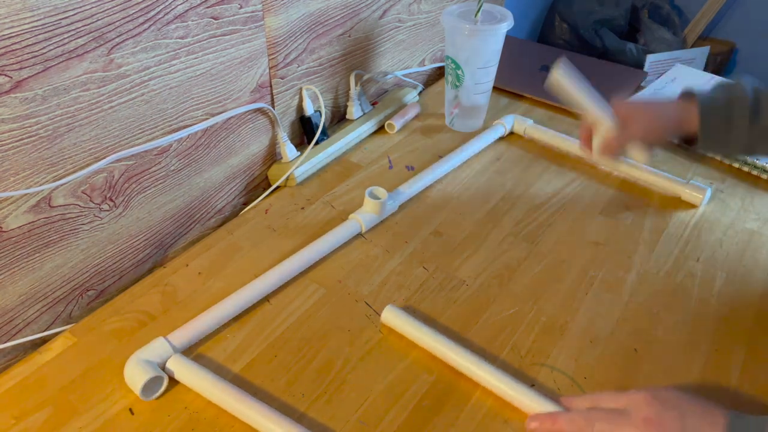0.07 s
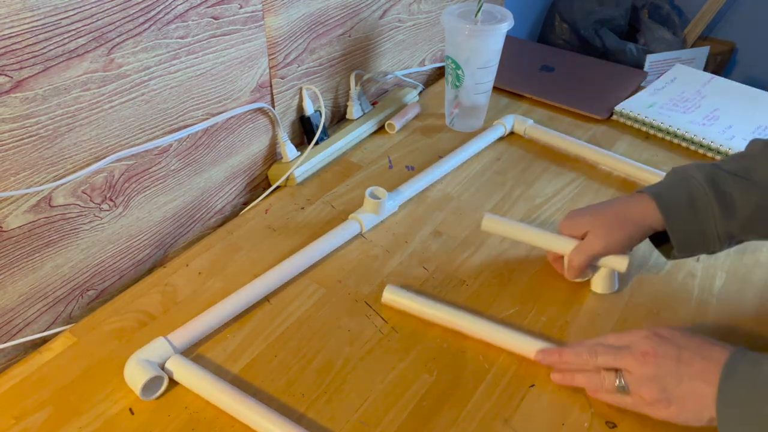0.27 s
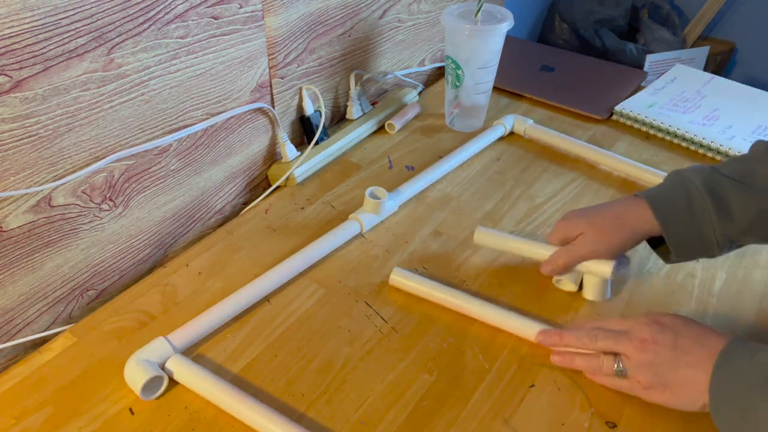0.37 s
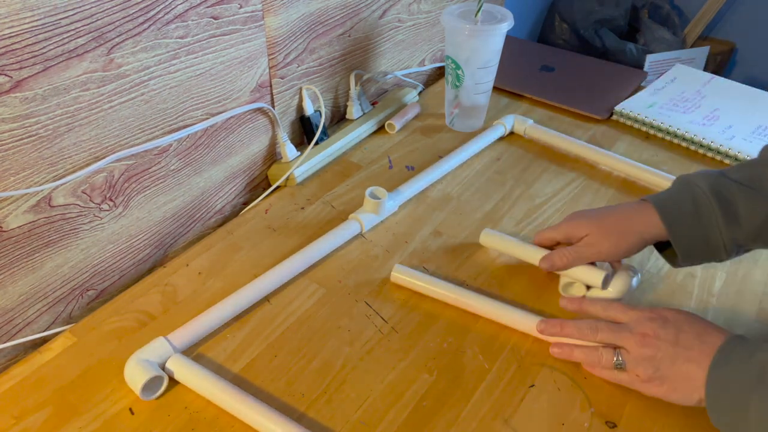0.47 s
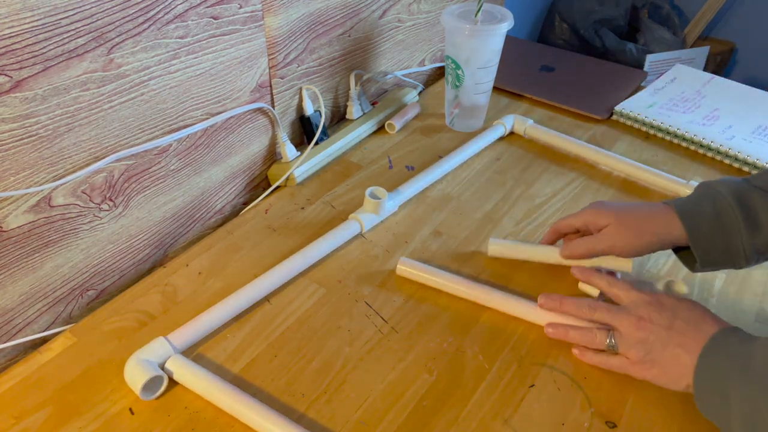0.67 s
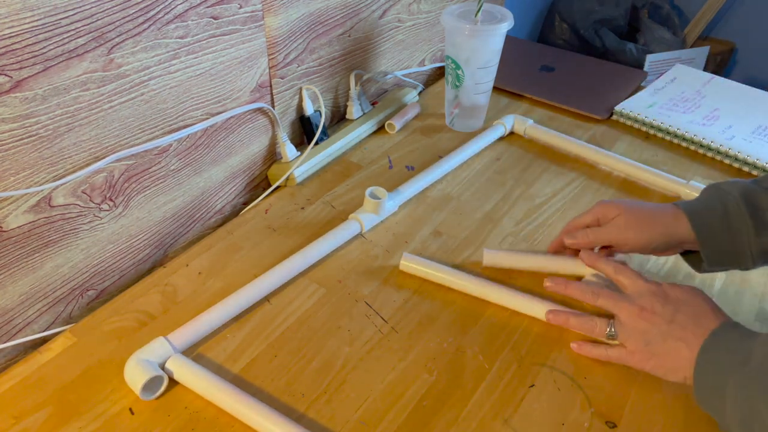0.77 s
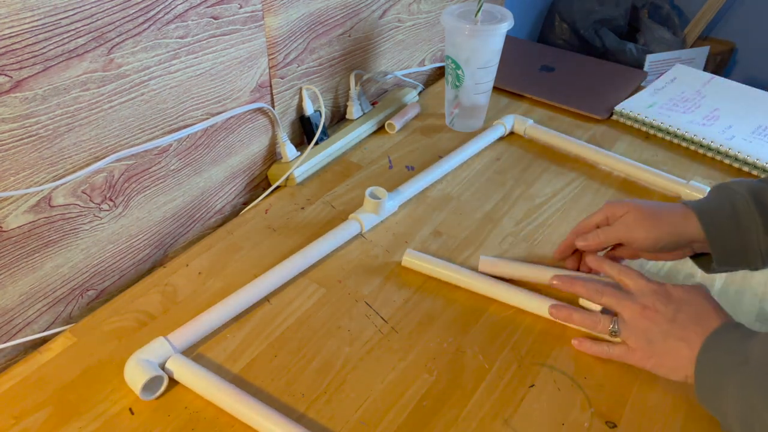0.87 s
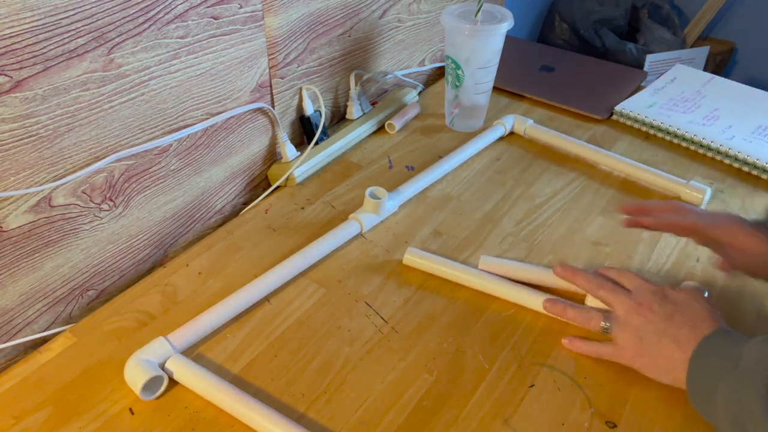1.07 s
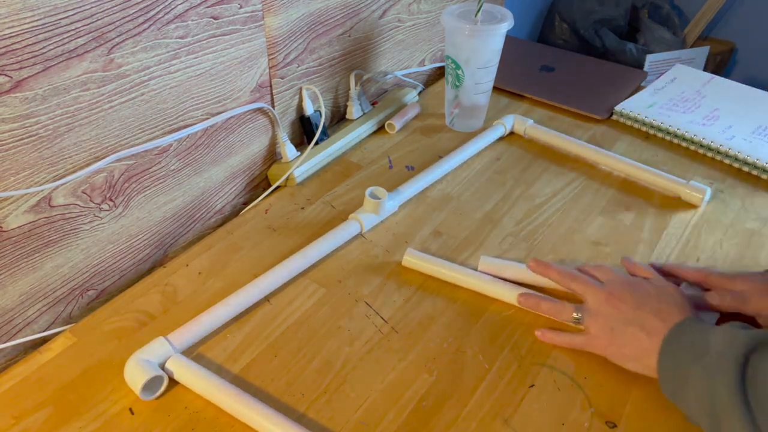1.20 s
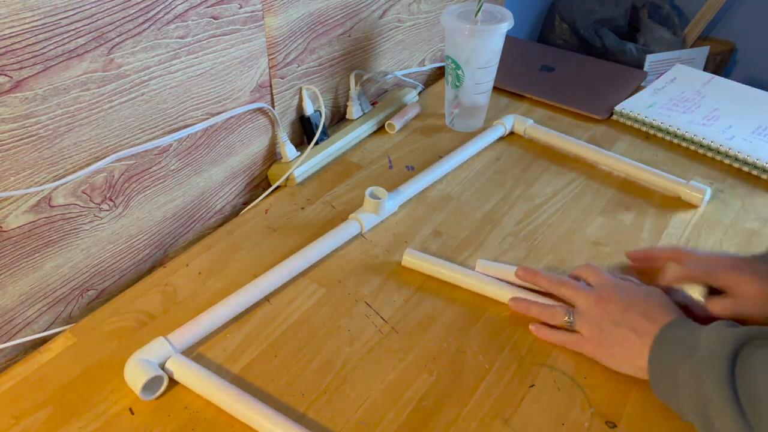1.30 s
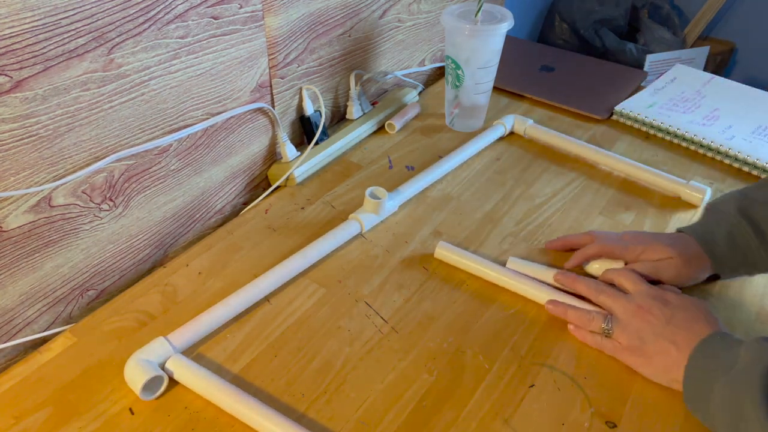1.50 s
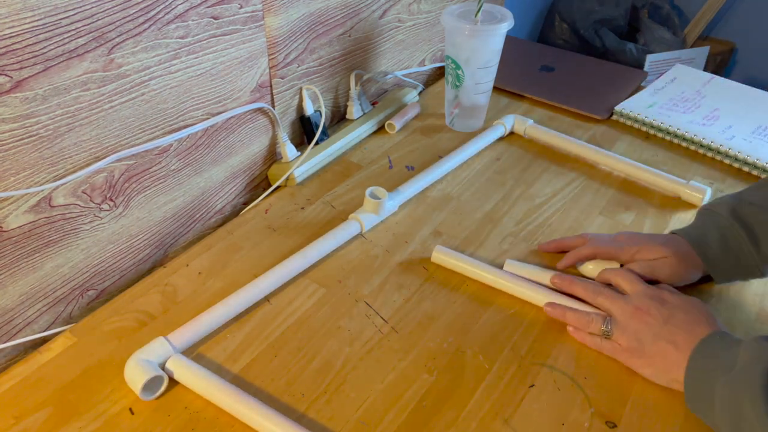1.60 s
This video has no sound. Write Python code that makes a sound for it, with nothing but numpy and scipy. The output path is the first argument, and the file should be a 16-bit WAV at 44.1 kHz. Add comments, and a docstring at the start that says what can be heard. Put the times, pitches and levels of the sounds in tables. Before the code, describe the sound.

Short lengths of plastic pipe knock together and rattle on a wooden table in a small room

```python
"""Hollow knocks, clacks and short rattles are heard in a small room, with dragging and scraping between.
Short plastic pipes are set down on a wooden table and pushed together: each knock is a noisy crack plus
dying sines for the ringing pipes. Soft thumps ring the tabletop, and fading bounces make the chatter.
Dragging and scraping are filtered clicks, with gliding, rough tones where the plastic judders.
An echoing tail of fading noise makes the room, over a quiet background noise."""
import sys
import numpy as np
from scipy import signal
from scipy.fft import rfft, irfft
from scipy.io import wavfile
from scipy.ndimage import uniform_filter1d

SR = 44100
rng = np.random.default_rng(int(sys.argv[2]) if len(sys.argv) > 2 else 0)


def waveform_to_disk(signal):
    """Save audio, clipped to [-1, 1], as 16-bit WAV at the path in sys.argv[1]."""
    frames = np.transpose(np.atleast_2d(signal))
    scaled = np.clip(frames, -1, 1) * 32767
    samples = np.round(scaled).astype(np.int16)
    wavfile.write(sys.argv[1], SR, samples)


N = 72765

# Colour of the background noise. Each row: frequency in Hz, relative level in dB.
FLOOR_COLOUR = [(25, -5), (110, 9.5), (230, -2), (600, 3), (2000, -27.5), (14000, -36.5)]
# How long the room rings. Each row: frequency in Hz, time to fade by 60 dB in seconds.
ROOM_FADE_TIMES = [(1300, 0.3), (4500, 0.2)]
# Strength of the room tail. Each row: frequency in Hz, level in dB.
ROOM_LEVELS = [(100, -26), (380, -2.5), (3000, -3.5), (8000, -6.5)]
# How alike left and right are in the room tail. Each row: frequency in Hz, likeness from -1 to 1.
ROOM_SIDE_LIKENESS = [(140, -0.16), (330, -0.13)]
# One pipe dragged over the wood. Each row: time in seconds, level in dB.
DRAG_LEVELS = [(0, -39.5), (.2, -43), (.33, -28), (.62, -41), (.72, -32), (.9, -29.5), (.98, -44),
               (1.08, -59)]
# Colour of the dragging. Each row: frequency in Hz, relative level in dB.
DRAG_COLOUR = [(40, -20), (100, 5.5), (220, -2), (420, 3), (800, -1), (2600, -25), (9000, -44.5)]
# Both pipes scraping along. Each row: time in seconds, level in dB.
SCRAPE_LEVELS = [(1.16, -64.5), (1.2, -40.5), (1.37, -34), (1.46, -38), (1.525, -46), (1.56, -68)]
# Colour of the scraping. Each row: frequency in Hz, relative level in dB.
SCRAPE_COLOUR = [(100, -1.5), (350, 3), (720, 11), (1300, -2), (2800, -19.5), (8500, -24.5), (11500, -41)]
# Juddering plastic, one list for each tone. Each row: time in seconds, pitch in Hz, level in dB.
JUDDER_TONES = [
    [(.01, 1250, -38), (.075, 715, -49), (.2, 691, -47.5)],
    [(.1, 291.2, -32), (.16, 407.6, -42.5), (.21, 406, -45)],
    [(1.22, 640, -45), (1.35, 755.3, -23.5), (1.47, 683, -52)],
    [(1.215, 830, -41), (1.335, 1312, -29), (1.48, 1249, -42.5)],
]
# Weight lands on the tabletop. Each row: start in seconds, relative level in dB.
THUDS = [(0.088, -38.5), (0.231, -18), (0.3645, -20.5), (0.416, -22.5), (0.524, -27.5), (0.786, -20),
         (1.16, -27.5), (1.471, -40)]
# Ways the tabletop rings. Each row: frequency in Hz, level in dB, time to fade by 60 dB in seconds.
TABLE_MODES = [(81.5, -10.5, 0.23), (116.8, -2, 0.18), (172, -2.5, 0.041)]
# The pipes chatter as they settle. Each row: start in seconds, length in seconds, relative first level in dB.
CHATTERS = [(0.385, .08, -19.5), (0.835, 0.084, -20.5)]
# Ways the pipes ring. Each row: middle frequency in Hz, relative level in dB, 60 dB fade time in seconds.
PIPE_MODES = [(387.7, -6, 0.11), (479.2, -10, 0.21), (561.5, -3, 0.14), (668, -3, 0.071),
              (739, -4.5, 0.091), (933, -4, 0.14), (983.5, 2.5, 0.056), (1169.4, 2, 0.039),
              (1304, -7, 0.12), (1640, -7.5, 0.17), (2072, -10, 0.12), (2538, -14.5, 0.29)]
# Colour shared by all contacts. Each row: frequency in Hz, relative level in dB.
CONTACT_COLOUR = [(240, -4), (430, 1.5), (2000, 2), (5600, -10), (7300, -7.5), (9500, -13.5),
                  (11500, -40.5), (15000, -21)]
# Pipe meets pipe or table. Each row: start in seconds, relative levels of the hollow body, the clack
# and the tick in dB, pitch of the struck wall in Hz.
KNOCKS = [(0.012, -28, -35, -44.5, 1495), (0.2288, -3, -14, -18, 1257), (0.3222, -25, -23, -23, 4015),
          (0.3605, -7.5, -14.5, -17, 1585), (0.3745, -24, -15.5, -14.5, 4310),
          (0.4105, -20.5, -18, -21, 2595), (0.5195, -11.5, -30, -40, 2420),
          (0.5268, -16, -20.5, -34.5, 1650), (0.549, -15.5, -22.5, -41.5, 1700),
          (0.5745, -18.5, -44, -48, 1650), (0.6998, -22.5, -27.5, -35, 3810),
          (0.7395, -19, -23, -29.5, 2180), (0.773, -13, -20.5, -24.5, 2100), (0.7835, -9, -10, -13.5, 2688),
          (0.8088, -22, -29, -29.5, 4400), (0.8133, -20.5, -24, -25, 4530),
          (0.8268, -17, -11.5, -15.5, 2756), (0.8305, -12.5, -13.5, -25, 4030),
          (0.9615, -49, -32.5, -44.5, 2655), (1.019, -36.5, -42, -53.5, 1620),
          (1.153, -32.5, -52, -54, 1240), (1.1645, -14, -29.5, -35.5, 1217), (1.1985, -26, -17, -32, 4280),
          (1.2648, -29.5, -29.5, -45, 2715), (1.3725, -17, -28, -48.5, 1663)]

TIME = np.arange(N) / SR  # seconds
PULSE_SIZE = 2048  # samples
BODY_HZ, CLACK_HZ, TICK_HZ = 1245, 2473, 6130  # where the three knock levels apply

FLOOR_DB = -57
ROOM_BUILD_S = 0.0031  # time scale on which the room tail swells in
GRAINS_PER_S, GRAIN_SPREAD_DB, RUB_LIKENESS = 2200, 0.5, 0.91
JUDDER_WIDTH_HZ, JUDDER_EDGE_S = 47, 0.0096  # fastest roughness; fade at both ends
THUD_DB, PUSH_S = 8, 0.0022  # added to every thud; a push peaks after a quarter of PUSH_S

CHATTER_PER_S, CHATTER_FADE_DB = 90, 12  # average bounce rate; drop over one run
CHATTER_CLACK_DB, CHATTER_TICK_DB = -3.5, -15  # compared with the body level
RING_DB, STRIKE_SPREAD_DB = -11.5, 1  # added to every pipe mode; its random spread
GRIP_DETUNE = 0.0078  # typical share by which the hand's hold shifts a mode from knock to knock
WALL_DB, WALL_T60_S = -3, 0.029  # level of a wall tone at CLACK_HZ; its 60 dB fade time
WALL_OVERTONE, WALL_OVERTONE_DB = 1.58, -1.5  # compared with the wall tone
CRACK_DB, CRACK_T60_S, CRACK_LIKENESS = 27, 0.052, 0.17
SNAP_ABOVE_HZ, SNAP_T60_S = 3360, 0.019  # the treble of a crack dies sooner


def from_db(db):
    """Turn decibels into a gain."""
    return 10 ** (np.asarray(db) / 20)


def rms_one(x):
    """Scale a sound so that its average strength (rms) is 1."""
    return x / np.sqrt(np.mean(x ** 2) + 1e-20)


def at_hz(points, hz):
    """Read a table between its rows, on a log-frequency axis."""
    table_hz, values = np.transpose(points)
    return np.interp(np.log(np.maximum(hz, 1)), np.log(table_hz), values)


def through(x, response):
    """Pass a sound through an impulse response, the answer of a body or room to one click."""
    return signal.fftconvolve(np.atleast_2d(x), np.atleast_2d(response), axes=-1)[:, :N]


def pulse(*colours):
    """Make a click that starts at once (minimum phase) and has the given colours, multiplied."""
    hz = np.arange(PULSE_SIZE // 2 + 1) * SR / PULSE_SIZE
    total_db = sum(at_hz(colour, hz) for colour in colours)
    cepstrum = irfft(np.log(from_db(total_db)))
    # Folding the second half onto the first packs the energy at the start.
    fold = np.r_[1, np.full(PULSE_SIZE // 2 - 1, 2), np.zeros(PULSE_SIZE // 2)]
    return irfft(np.exp(rfft(cepstrum * fold)))


def add(track, s, sound):
    """Mix a sound into a track at a time in seconds."""
    i = int(np.clip(s * SR, 0, N - 1))
    track[..., i:i + sound.shape[-1]] += sound[..., :N - i]


def stereo(pair, likeness):
    """Turn two unrelated signals into left and right of a given likeness."""
    c = np.clip(likeness, -1, 1)
    middle = np.sqrt((1 + c) / 2) * pair[0]
    side = np.sqrt((1 - c) / 2) * pair[1]
    return middle + side * np.array([[1], [-1]])


def ringing(modes, size=N):
    """A struck body rings as a sum of dying sines, here of alternating sign."""
    t = TIME[:size]
    out = 0
    for k, (hz, db, t60) in enumerate(modes):
        fade = from_db(db - 60 * t / t60)
        out = out + (-1) ** k * fade * np.sin(2 * np.pi * hz * t)
    return out


def background():
    """A quiet, steady noise with a fixed colour."""
    noise = stereo(rng.standard_normal((2, N)), 0.09)
    return from_db(FLOOR_DB) * rms_one(through(noise, pulse(FLOOR_COLOUR)))


def room():
    """Impulse response of the room: a diffuse noise tail that dies band by band."""
    out = 0
    edges = 60 * 2 ** (np.arange(18) / 2)  # half-octave bands
    white = rng.standard_normal((2, 2, N))
    for k, (low, high) in enumerate(zip(edges, edges[1:])):
        hz = np.sqrt(low * high)
        band_filter = signal.butter(2, [low, high], "band", fs=SR, output="sos")
        band = signal.sosfilt(band_filter, white[k % 2])
        build = 1 - np.exp(-(TIME / ROOM_BUILD_S) ** 2)
        fade = from_db(-60 * TIME / at_hz(ROOM_FADE_TIMES, hz)) * build
        fade = fade / np.linalg.norm(fade)
        level = from_db(at_hz(ROOM_LEVELS, hz))
        out = out + level * stereo(band, at_hz(ROOM_SIDE_LIKENESS, hz)) * fade
    return out


def rub(levels, colour):
    """Sliding friction: a dense stream of tiny catches of uneven size."""
    luck = np.minimum(rng.exponential(1, (2, N)), 4)
    sizes = from_db(GRAIN_SPREAD_DB * luck) * rng.choice([-1, 1], (2, N))
    catches = rng.random((2, N)) < GRAINS_PER_S / SR
    sound = through(stereo(sizes * catches, RUB_LIKENESS), pulse(colour))
    s, db = np.transpose(levels)
    return rms_one(sound) * from_db(np.interp(TIME, s, db, left=-100, right=-100))


def judder():
    """Stick and slip of a sliding pipe: rough, gliding tones, the high ones less steady."""
    out = 0
    smooth = signal.butter(2, JUDDER_WIDTH_HZ, fs=SR, output="sos")
    for rows in JUDDER_TONES:
        s, hz, db = np.transpose(rows)
        phase = 2 * np.pi * np.cumsum(np.interp(TIME, s, hz)) / SR
        edges = np.clip(np.minimum(TIME - s[0], s[-1] - TIME) / JUDDER_EDGE_S, 0, 1)
        level = from_db(np.interp(TIME, s, db)) * edges
        # Slow noise roughens the loudness (swell) and the phase (slip).
        swell, slip = rms_one(signal.sosfilt(smooth, rng.standard_normal((2, N))))
        rough_level = level * np.maximum(1 + swell, 0) / np.sqrt(2)
        out = out + rough_level * np.sin(phase + slip * hz.mean() / BODY_HZ)
    return out


def tabletop():
    """Landing weight pushes softly into the low ringing modes of the table."""
    force = np.zeros(N)
    push = TIME * np.exp(-4 * TIME / PUSH_S)
    for s, db in THUDS:
        add(force, s, from_db(db + THUD_DB) * push / push.sum())
    low_cut = signal.butter(2, 55, "high", fs=SR, output="sos")
    return signal.sosfilt(low_cut, through(force, ringing(TABLE_MODES)))


def chatter():
    """Settling pipes make uneven, fading runs of small bounces, given as rows like the knocks."""
    rows = []
    for s, length, db in CHATTERS:
        for k, (slip, luck, spot) in enumerate(rng.uniform(-1, 1, (30, 3))):
            age = (k + .5 + slip / 2) / CHATTER_PER_S
            if age >= length:
                continue
            body = db - CHATTER_FADE_DB * age / length + 4 * luck
            wall_hz = CLACK_HZ * 2 ** (spot + .5)
            rows.append((s + age, body, body + CHATTER_CLACK_DB, body + CHATTER_TICK_DB, wall_hz))
    return rows


def crack():
    """Many heavily damped modes of one contact, evened in spectrum: a woody burst and a brief snap."""
    burst = 0
    for kind, t60 in ("low", CRACK_T60_S), ("high", SNAP_T60_S):
        fade = from_db(-60 * TIME[:PULSE_SIZE] / t60)
        white = rng.standard_normal((2, PULSE_SIZE)) * fade / np.linalg.norm(fade)
        split = signal.butter(2, SNAP_ABOVE_HZ, kind, fs=SR, output="sos")
        burst = burst + signal.sosfilt(split, white)
    spectrum = rfft(burst)
    nearby_power = uniform_filter1d(abs(spectrum) ** 2, size=31)
    even = irfft(spectrum / np.sqrt(nearby_power))
    return stereo(even[:, :PULSE_SIZE // 2], CRACK_LIKENESS)


def pipe_ring(wall_hz):
    """The pipes' modes, weighted anew by where they are struck, and the wall's short ring at that spot."""
    luck = rng.normal(0, 1, len(PIPE_MODES)) * STRIKE_SPREAD_DB + RING_DB
    modes = []
    for (hz, db, t60), more in zip(PIPE_MODES, luck):
        modes.append((hz * rng.normal(1, GRIP_DETUNE), db + more, t60))
    wall_db = WALL_DB + 20 * np.log10(wall_hz / CLACK_HZ)  # high wall tones ring out more
    modes.append((wall_hz, wall_db, WALL_T60_S))
    modes.append((wall_hz * WALL_OVERTONE, wall_db + WALL_OVERTONE_DB, WALL_T60_S))
    return ringing(modes, size=SR // 4)


def knocks():
    """Every contact gives a crack and sets the pipes ringing."""
    out = np.zeros((2, N))
    for s, body, clack, tick, wall_hz in list(KNOCKS) + chatter():
        blow = pulse(CONTACT_COLOUR, [(BODY_HZ, body), (CLACK_HZ, clack), (TICK_HZ, tick)])
        add(out, s, through(blow, pipe_ring(wall_hz)))
        add(out, s, from_db(CRACK_DB) * through(blow, crack()))
    return out


def scene():
    """Pipes and table in the room, over a quiet background."""
    quiet_noise = background()
    tail = room()
    sliding = rub(DRAG_LEVELS, DRAG_COLOUR) + rub(SCRAPE_LEVELS, SCRAPE_COLOUR) + judder()
    direct = sliding + tabletop() + knocks()
    return direct + through(direct, tail) + quiet_noise


def record(dry):
    """The highest peaks are rounded and the top of the treble is cut."""
    rounded = dry / (1 + dry ** 4) ** (1 / 4)
    # From 16900 Hz up, everything is at least 60 dB down.
    top_cut = signal.cheby2(12, 60, 16900, fs=SR, output="sos")
    return signal.sosfilt(top_cut, rounded)


dry = scene()
out = record(dry)
waveform_to_disk(out)
```